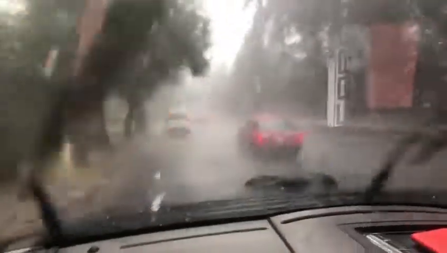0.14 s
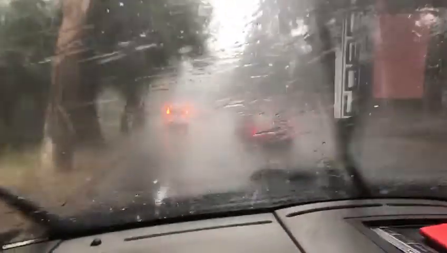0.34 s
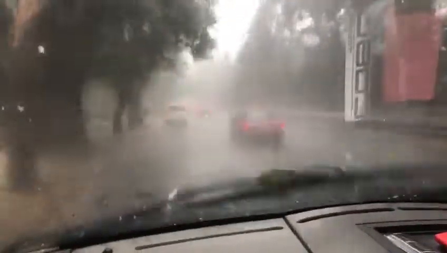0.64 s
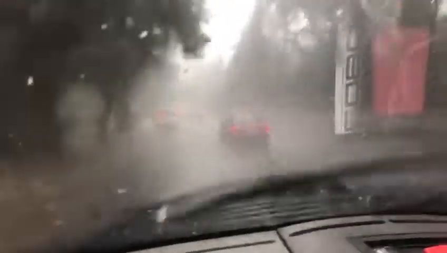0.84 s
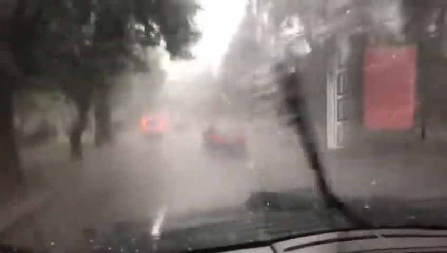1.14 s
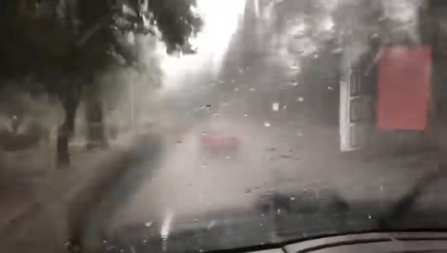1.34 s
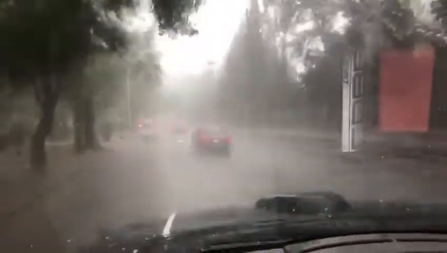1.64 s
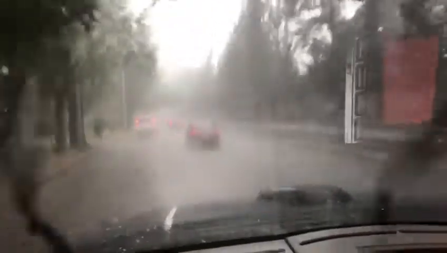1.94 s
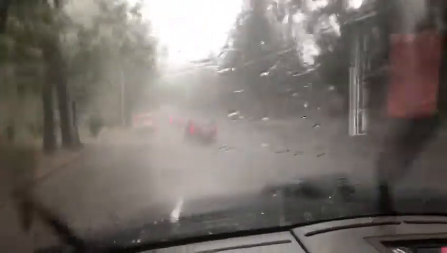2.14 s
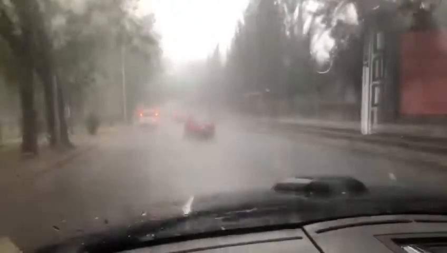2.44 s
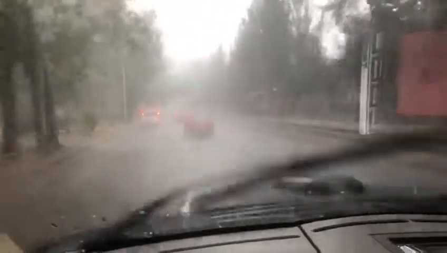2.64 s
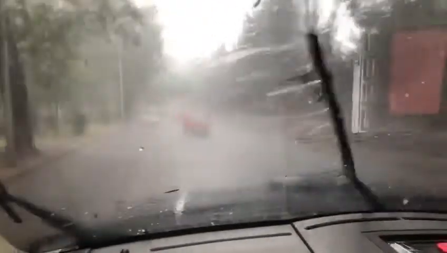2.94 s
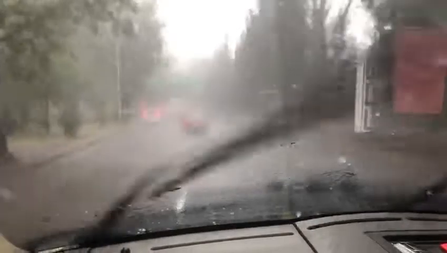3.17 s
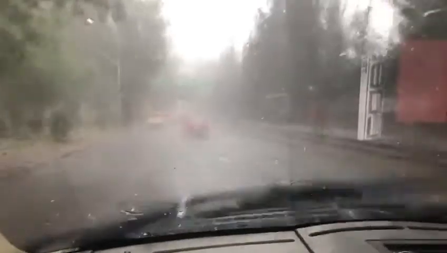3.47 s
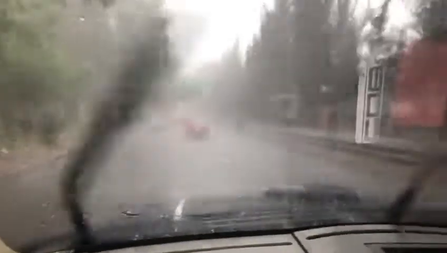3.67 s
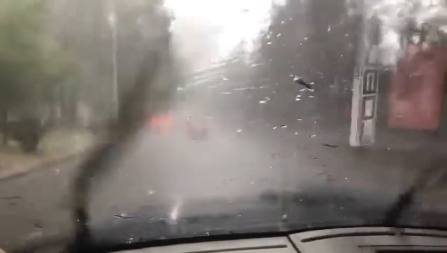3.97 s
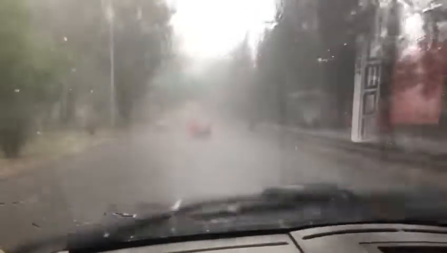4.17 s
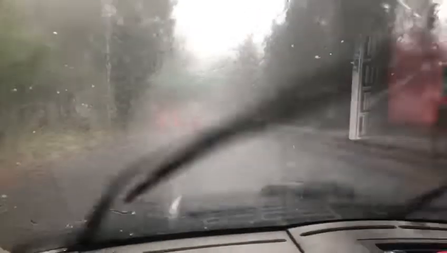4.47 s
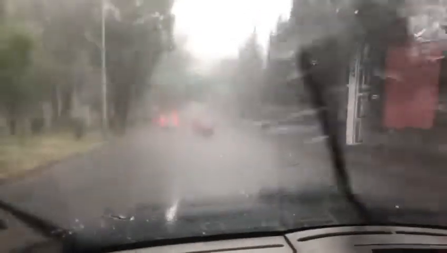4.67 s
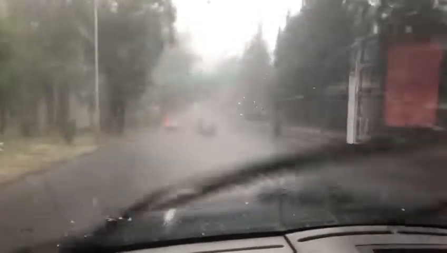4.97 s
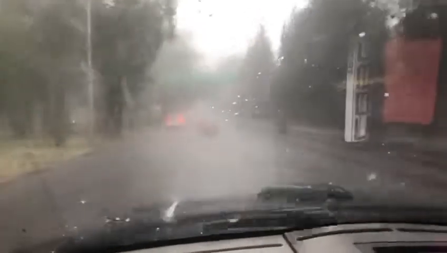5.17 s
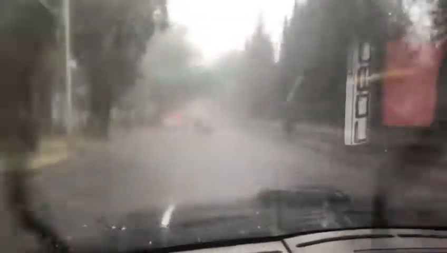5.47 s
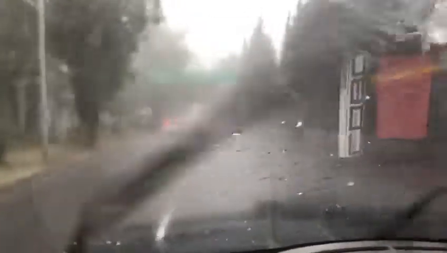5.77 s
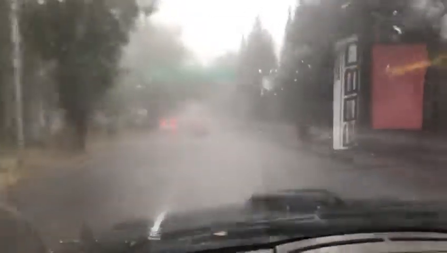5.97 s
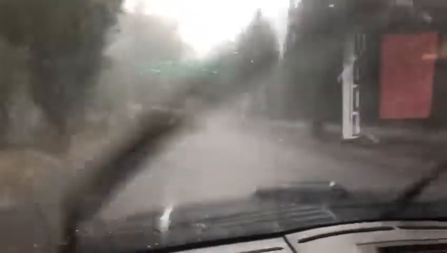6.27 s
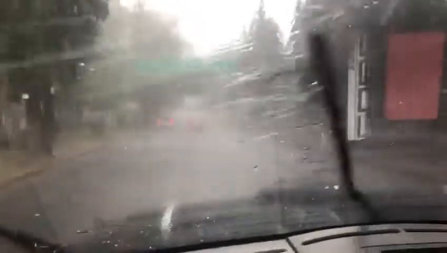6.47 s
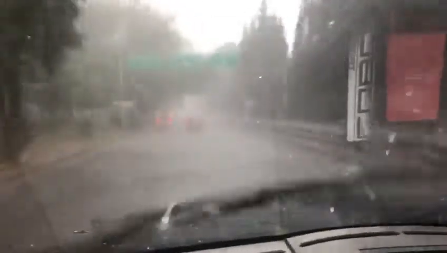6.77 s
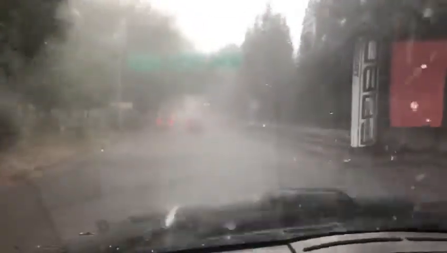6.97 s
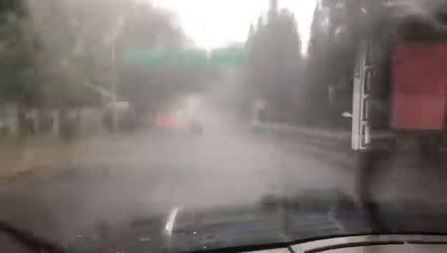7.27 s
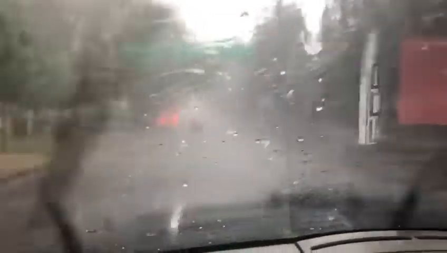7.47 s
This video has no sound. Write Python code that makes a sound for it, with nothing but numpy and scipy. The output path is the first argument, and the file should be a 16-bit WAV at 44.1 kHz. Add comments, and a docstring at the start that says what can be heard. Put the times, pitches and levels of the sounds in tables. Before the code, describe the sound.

Inside a car during a violent hailstorm, a phone close to the windshield picks up constant loud clatter. Hard stones crack on the glass in rapid irregular succession, some with bright ticks, over a dense patter of pellets and rain. The metal roof drums dully, occasional heavy blows thud, and the closed cabin booms low. Tiny lulls pass, but the storm never stops. Peaks are slightly squashed.

```python
"""Inside a car near the windshield, under hail and heavy rain, as a phone hears it.
Large and middling stones crack on the glass, a bright tick and a short ring with each.
Random small blows on noise-built plate responses make the patter of pellets and drops,
the drumming of the roof and the boom of the cabin; heavy blows thud as pitched noise bursts.
The phone rounds the peaks and cuts the top."""
import sys
import numpy as np
from scipy import signal
from scipy.fft import rfft, irfft
from scipy.io import wavfile

SR = 44100
rng = np.random.default_rng(int(sys.argv[2]) if len(sys.argv) > 2 else 0)


def undo_db(level):
    """Turn decibels back into plain size, where 20 dB means ten times bigger."""
    steps = np.asarray(level, float) / 20
    return 10 ** steps


def log_audio(samples):
    """Write samples as a 16-bit WAV file to the path given in sys.argv[1]."""
    # one column per channel
    frames = np.atleast_2d(samples).T
    # limit to full scale, then quantise
    limited = np.clip(frames, -1, 1)
    pcm = np.round(limited * 32767).astype(np.int16)
    wavfile.write(sys.argv[1], SR, pcm)


N = 336042
RING_SAMPLES = 8192

# Largest and sharpest stones on the windshield.
# Each row: time of the crack's peak in seconds, crack level in dB, bright tick level in dB.
BIG_STONES = [(0.1203, -4, -19), (0.21, -9, -19), (0.2717, -4, -23), (0.315, -7, -14), (0.394, -3, -19),
              (0.4151, -5, -8), (0.433, -3, -14), (0.482, -4, -24), (0.5466, -2, -10), (0.5538, -5, -8),
              (0.5976, -5, -15), (0.6973, -1, -20), (0.7194, -5, -7), (0.7545, -9, -8), (0.867, -6, -23),
              (0.9218, -3, -7), (0.95, -2.5, -20), (1.0923, -11, -14), (1.1082, -13, -8), (1.148, -13, -23),
              (1.1968, -3, -20), (1.207, -11, -7), (1.23, -9, -15), (1.254, -3.5, -12), (1.314, -3.5, -13),
              (1.3806, -5, -9), (1.4022, -4.5, -16), (1.414, -3, -7), (1.4464, -1, -15), (1.4744, -2, -14),
              (1.621, -1, -16), (1.6778, -8, -32), (1.7044, -3.5, -31), (1.738, -6, -25), (1.772, -5, -30),
              (1.802, -6, -6), (1.8113, -6.5, -21), (1.8947, -7.5, -17), (1.906, -5, -2), (1.99, -5.5, -23),
              (2.0102, -2.5, -18), (2.0203, -6, -19), (2.0519, -5.5, -14), (2.085, -6, -24),
              (2.1304, -5, -22), (2.1481, -1.5, -18), (2.1684, -4, -13), (2.201, -2, -15),
              (2.4567, -2, -15), (2.503, -7.5, -27), (2.541, -9, -23), (2.5717, -3.5, -23),
              (2.5921, -3, -16), (2.6199, -3, -12), (2.67, -9, -24), (2.7564, -2.5, -22), (2.793, -5, -12),
              (2.8396, -5.5, -5), (2.919, -6, -12), (2.95, -5, -17), (3.079, -7, -14),
              (3.1281, -6.5, -26.5), (3.168, -8, -16), (3.2248, -1.5, -12), (3.2955, -8.5, -20),
              (3.367, -4, -28), (3.376, -4, -18), (3.416, -8, -28), (3.5167, -9, -20), (3.5438, -5, -22),
              (3.616, -2, -22), (3.719, -5, -14), (3.751, -11, -3), (3.762, -1.5, -12), (3.8976, -2.5, -11),
              (3.944, -7, -6.5), (3.9755, -6, -21), (3.9912, -3.5, -17), (4.0868, -7, -15),
              (4.1024, -2.5, -18), (4.1867, -4, -15), (4.224, -3, -9), (4.3239, -9, -4), (4.366, -5.5, -9),
              (4.437, -3.5, -12), (4.461, -1.5, -20), (4.5506, -2.5, -16), (4.5716, -13, -6),
              (4.5883, -5, -17), (4.599, -3, -18), (4.611, -3, -20), (4.655, -7, -21), (4.7068, -6, -20),
              (4.7813, -17, -6), (4.859, -4, -18), (4.9107, -10, -6), (4.93, -12, -7), (4.982, -1, -4),
              (5.0003, -5, -16), (5.04, -7, -24), (5.09, -0.5, -24), (5.1137, -4.5, -20), (5.1926, -6, -18),
              (5.2124, -4, -23), (5.2474, -6, -5), (5.2987, -11, -4), (5.3279, -7, -5), (5.3852, -3, -18),
              (5.433, -4, -20), (5.4447, -4.5, -20), (5.4705, -4, -20), (5.5036, -3.5, -18),
              (5.5225, -3, -18), (5.5303, -5, -16), (5.5612, -3, -17), (5.615, -6, -5), (5.6344, -11, -9),
              (5.7193, -6.5, -5), (5.767, -3.5, -25), (5.777, -6, -6), (5.8909, -1.5, -8), (5.9206, -8, -8),
              (5.942, -1.5, -21), (5.97, -5.5, -3), (6.036, -10.5, -6), (6.1226, -4, -18), (6.188, -6, -19),
              (6.2283, -9, -10), (6.2419, -8, -5), (6.283, -2, -8), (6.3336, -8, -8), (6.354, -1.5, -12),
              (6.3822, -2, -11), (6.464, -11, -28), (6.532, -1.5, -9), (6.5442, -3, -13),
              (6.6229, -10, -4.5), (6.677, -2.5, -23), (6.7129, -2, -25), (6.7344, -6, -20),
              (6.797, -3, -13), (6.858, -6, -9), (6.887, -7, -13), (6.934, -5.5, -8), (6.9934, -4, -15),
              (7.02, -4.5, -11), (7.046, -4, -23), (7.0954, -1, -19), (7.1077, -3.5, -19),
              (7.1278, -2, -16), (7.247, -8, -19), (7.3163, -11, -10), (7.3418, -3.5, -10),
              (7.3838, -5, -21), (7.4161, -4.5, -9), (7.4434, -4, -13), (7.514, -3, -22),
              (7.527, -6.5, -18)]
# Strength of the fall before lulls. Each row: time in seconds, rms of the patter on the glass in dB,
# rms of the drumming on the roof in dB, rms of the cabin boom in dB.
FALL_LEVELS = [(0.0, -25, -17.5, -11), (0.5, -17.5, -17.5, -16.5), (0.84, -20, -17.5, -17.5),
               (0.98, -15.5, -14, -16.5), (1.12, -19, -16.5, -16.5), (1.4, -23, -18.5, -21),
               (2.21, -20.5, -17, -18), (2.61, -27, -23, -22.5), (2.97, -17.5, -19, -15.5),
               (3.2, -24.5, -18.5, -13), (3.45, -22, -21.5, -23.5), (3.7, -18.5, -17.5, -16),
               (4.31, -19, -18.5, -17.5), (5.03, -19, -16.5, -15), (5.6, -21, -19, -18.5),
               (6.1, -19.5, -16, -16.5), (6.53, -18.5, -18.5, -19), (7.0, -20.5, -20, -17),
               (7.3, -17, -15.5, -20.5), (7.62, -20, -16.5, -19.5)]
# Struck plates: pane, roof and car body.
# Each row: frequency in Hz, relative level in dB, 60 dB decay time in seconds.
GLASS_MODES = [(300, 1, 0.17), (710, 0, 0.13), (1460, -5, 0.053), (2940, 0, 0.073), (4640, -9.5, 0.089),
               (8580, -16, 0.066), (12600, -41, 0.085)]
ROOF_MODES = [(123, -7.5, 0.35), (250, -0.5, 0.15), (497, -6.5, 0.21), (960, -5.5, 0.088),
              (1610, -9, 0.094), (3170, -20, 0.038)]
BODY_MODES = [(19.05, -4.5, 0.32), (40.5, 0.5, 0.26), (89, -3, 0.22), (147.6, -5, 0.17), (249, -13, 0.13)]
# Roof panel resonances. Each row: frequency in Hz, width in Hz, level in dB re the knocks' filter input.
ROOF_RESONANCES = [(361, 25, -1.5), (745, 90, -9.5), (159, 28, -5)]
# Heaviest blows on roof and body. Each row: time of the peak in seconds, peak level in dB, pitch in Hz.
HEAVY_BLOWS = [(0.147, -5, 49.8), (0.203, -3, 287), (0.212, 1, 84), (0.439, -8, 51.0), (0.664, -6.5, 84.0),
               (0.761, -3.5, 73.6), (0.992, -4, 375), (1.177, -9, 338), (1.297, -8.5, 73.4),
               (1.349, -8.5, 445), (1.36, -6, 800), (2.068, -8, 55.0), (2.634, -6.5, 61.0),
               (2.686, -5, 91.6), (3.077, -6, 320.0), (3.094, -5, 62), (3.154, -4, 58.4), (3.225, -7, 600),
               (3.282, -8, 74), (3.328, -1.5, 300.0), (4.092, -5.5, 410), (4.49, -6, 306), (4.5, -3, 75),
               (4.75, -2.5, 61.7), (4.759, -9, 328), (4.869, -2, 269), (4.88, -7, 76), (4.969, -8, 61),
               (5.017, -7.5, 280), (5.396, -3.5, 383), (5.637, -6, 360.0), (6.065, -6, 76.5),
               (6.142, -4, 460), (6.15, -6, 700), (6.158, -9, 102), (6.426, -6.5, 413), (6.51, -7, 65.7),
               (7.102, -2, 68.6), (7.157, -4.5, 400.0)]
# Moments when the fall thins out. Each row: middle in seconds, length in seconds, depth in dB.
FALL_LULLS = [(0.284, 0.1, -4), (1.311, 0.053, -9), (1.494, 0.024, -6.5), (1.658, 0.039, -8),
              (1.724, 0.027, -12), (1.865, 0.12, -4), (2.14, 0.068, -7.5), (2.74, 0.04, -5),
              (3.519, 0.11, -8.5), (3.916, 0.052, -6.5), (4.027, 0.085, -4.5), (4.296, 0.04, -6.5),
              (4.378, 0.082, -8.5), (4.684, 0.049, -8), (4.847, 0.072, -8.5), (4.889, 0.024, -6),
              (5.024, 0.015, -11), (5.163, 0.066, -9.5), (5.227, 0.028, -11.5), (5.816, 0.024, -5),
              (6.606, 0.041, -6.5), (6.963, 0.025, -4)]


def stones():
    """The large stones on the windshield: a crack and a tick each, at listed times and levels."""
    peak_s, crack_db, tick_db = np.transpose(BIG_STONES)[:, :, None]
    crack, tick = strikes(count=len(peak_s))
    start_s = peak_s[:, 0] - 0.0014
    return place(start_s, undo_db(crack_db) * crack + undo_db(tick_db) * tick)


def middling():
    """Middling stones at random moments, each with its own weight and sharpness."""
    rate_per_s, crack_mean_db, tick_mean_db, scatter_db = 7, -12.5, -19, 2.5
    count = int(rate_per_s * N / SR)
    start_s = rng.random(count) * N / SR
    weight, sharpness = rng.standard_normal((count, 2)).T[:, :, None]
    crack, tick = strikes(count=count)
    crack_db = crack_mean_db + scatter_db * weight
    tick_db = tick_mean_db + 2 * scatter_db * sharpness
    return place(start_s, undo_db(crack_db) * crack + undo_db(tick_db) * tick)


def strikes(count):
    """Ice on glass: a short crack with the ring of the pane, and the bright tick of the contact."""
    size = 4096
    t, bins_hz = np.arange(size) / SR, np.fft.rfftfreq(size, 1 / SR)
    noise = rfft(rng.standard_normal((count, size)))
    pitch_hz = 3200 * 2 ** (0.12 * rng.standard_normal((count, 1)))  # every spot has its own
    crack_colour = bump(bins_hz, pitch_hz, 0.27) + bump(bins_hz, 2790, 0.79)
    crack = burst(irfft(noise * crack_colour), t, rise_s=0.0014)
    tick_sound = irfft(noise * bump(bins_hz, 5770, 0.42))
    tick = burst(tick_sound, np.maximum(t - 0.0008, 0), rise_s=0.00023)
    ring = plate(GLASS_MODES, count=count, travel_s=0.0027, rise_cycles=3.6, size=size)
    return crack + level(ring, -24.5), tick


def patter():
    """Small hail ticks like the large, over a dense wash of drops on the pane; rms 1."""
    crack, tick = strikes(count=12)
    pellets = shower(crack + undo_db(-21) * tick, rate_per_s=260, spread_db=6.3)
    pane = plate(GLASS_MODES, count=10, travel_s=0.0026, rise_cycles=0.75, size=RING_SAMPLES // 2)
    drops = shower(pane, rate_per_s=900, spread_db=2.7)
    return level(pellets + undo_db(-4) * drops, 0)


def roof():
    """Hail drums the lined sheet metal: dull knocks, a few panel resonances standing out; rms 1."""
    panel = plate(ROOF_MODES, count=12, travel_s=0.0019, rise_cycles=1.5, size=RING_SAMPLES)
    knocks = shower(panel, rate_per_s=250, spread_db=4.17)
    drumming = knocks
    for hz, width_hz, db in ROOF_RESONANCES:
        b, a = signal.iirpeak(hz, hz / width_hz, SR)
        drumming = drumming + undo_db(db) * signal.lfilter(b, a, knocks)
    return level(drumming, 0)


def thuds():
    """A big stone flexes a panel for a cycle or two around its pitch."""
    peak_s, db, pitch_hz = np.transpose(HEAVY_BLOWS)[:, :, None]
    t, bins_hz = np.arange(RING_SAMPLES) / SR, np.fft.rfftfreq(RING_SAMPLES, 1 / SR)
    noise = rfft(rng.standard_normal((len(peak_s), RING_SAMPLES)))
    higher_modes = undo_db(-10) * bump(bins_hz, 2.57 * pitch_hz, 0.49)
    colour = bump(bins_hz, pitch_hz, 0.54) + higher_modes
    rise_s = 0.00294 + 0.57 / pitch_hz
    hits = burst(irfft(noise * colour), t, rise_s)
    return place((peak_s - rise_s)[:, 0], undo_db(db) * hits)


def cabin_boom():
    """Random blows set off the low, slowly fading modes of the body; rms 1."""
    body = plate(BODY_MODES, count=12, travel_s=0.0011, rise_cycles=0.75, size=2 * RING_SAMPLES)
    return shower(body, rate_per_s=120, spread_db=2.85)


def plate(table, count, travel_s, rise_cycles, size):
    """Responses of a plate struck at unrelated spots: dense modes fade band by band.
    Bending waves run faster at high pitch, so treble comes first; travel_s is the delay at 1 kHz."""
    hz, db, t60_s = np.transpose(table)
    t, bins_hz = np.arange(size) / SR, np.fft.rfftfreq(size, 1 / SR)
    noise = rfft(rng.standard_normal((count, size)))
    octaves = np.arange(0, np.log2(hz[-1] / hz[0]) + 0.5, 0.5)
    out = 0
    for band_hz in hz[0] * 2 ** octaves:
        age_s = np.maximum(t - travel_s * np.sqrt(1000 / band_hz), 0)
        band_t60_s = np.interp(np.log(band_hz), np.log(hz), t60_s)
        band_db = np.interp(np.log(band_hz), np.log(hz), db)
        fade = np.exp(-np.log(1000) * age_s / band_t60_s)
        rise = 1 - np.exp(-age_s * band_hz / rise_cycles)
        band = irfft(noise * bump(bins_hz, band_hz, 0.2), size)
        out = out + undo_db(band_db) * rise * fade * band
    return out


def shower(rings, rate_per_s, spread_db):
    """Random blows, most small and a few large, shared out over the struck spots; rms 1."""
    out = 0
    for ring in rings:
        struck = rng.random(N) < rate_per_s / SR / len(rings)
        size = np.minimum(rng.exponential(size=N), 3.2)
        out = out + signal.fftconvolve(struck * undo_db(spread_db * size), ring)[:N]
    return level(out, 0)


def burst(sound, t, rise_s):
    """Swell to a peak of 1 near rise_s, then die away."""
    shaped = sound * ((t / rise_s) * np.exp(-t / rise_s)) ** 1.4
    return shaped / np.abs(shaped).max(axis=1, keepdims=True)


def place(start_s, hits):
    """Lay each row of sound down at its time."""
    out = np.zeros(N + hits.shape[1])
    for at, hit in zip(np.maximum(start_s * SR, 0).astype(int), hits):
        out[at:at + len(hit)] += hit
    return out[:N]


def bump(hz, centre_hz, octaves):
    """Bell curve on a log-frequency axis."""
    return np.exp(-0.5 * (np.log2(np.maximum(hz, 1) / centre_hz) / octaves) ** 2)


def level(x, db):
    """Scale to an rms level."""
    return x * undo_db(db) / np.sqrt(np.mean(x ** 2))


def scene():
    """Glass, roof and cabin under one fall of hail."""
    t = np.arange(N) / SR
    time_s, *columns_db = np.transpose(FALL_LEVELS)
    on_glass, on_roof, in_cabin = (undo_db(np.interp(t, time_s, db)) for db in columns_db)
    lull_db = np.zeros(N)
    for middle_s, length_s, depth_db in FALL_LULLS:
        lull_db += depth_db * np.exp(-(2 * (t - middle_s) / length_s) ** 4)
    boom = in_cabin * cabin_boom()
    # glass and roof go quiet together in a lull; the cabin keeps booming
    fall = undo_db(lull_db) * (on_glass * patter() + middling() + on_roof * roof())
    return (stones() + thuds() + fall + boom)[None]


def band_limit(x):
    """A steep low-pass at the top of the band."""
    return signal.sosfilt(signal.butter(12, 12320, fs=SR, output="sos"), x)


def record(dry):
    """The phone rounds the loudest peaks and cuts the top."""
    rounded = 1.282 * np.tanh(dry / 1.28)
    top_hz = 11600
    lowpass = signal.ellip(8, 0.2, 60, top_hz, fs=SR, output="sos")
    mix = np.clip(signal.sosfilt(lowpass, rounded), -1, 1)
    return band_limit(mix)


dry = scene()
out = record(dry)
log_audio(out)
```